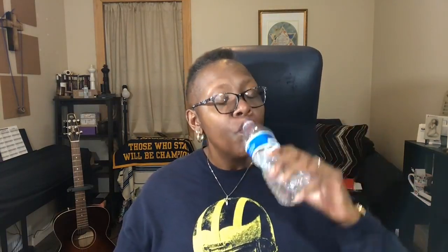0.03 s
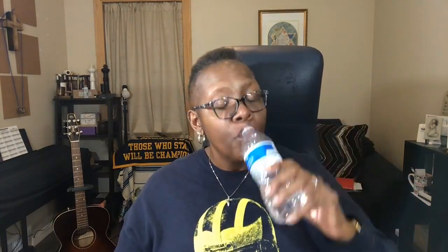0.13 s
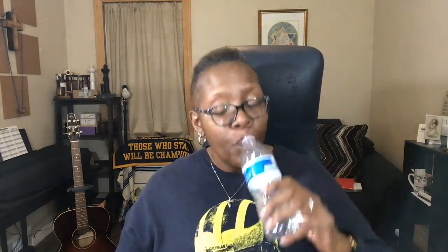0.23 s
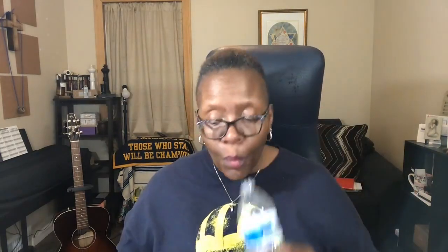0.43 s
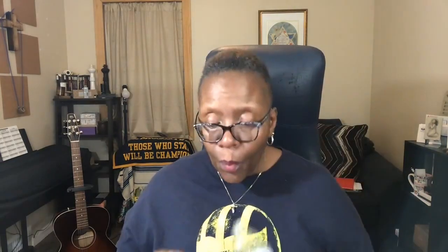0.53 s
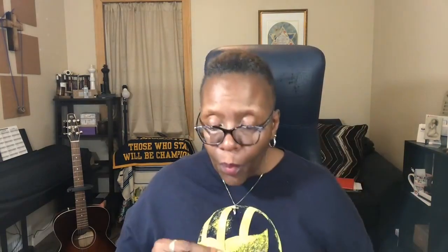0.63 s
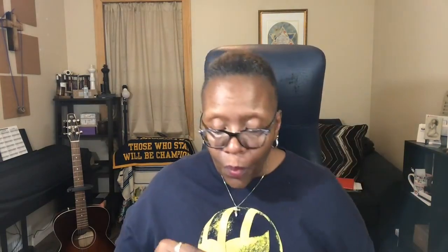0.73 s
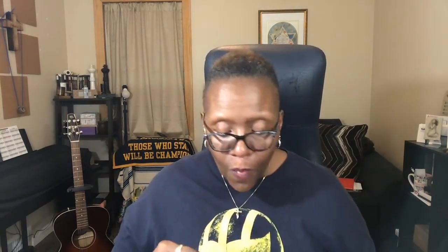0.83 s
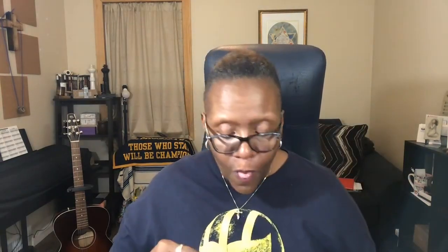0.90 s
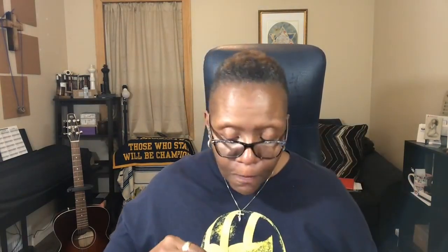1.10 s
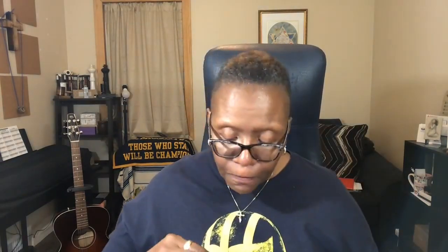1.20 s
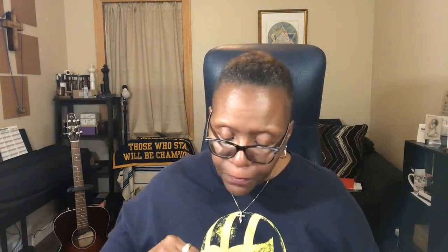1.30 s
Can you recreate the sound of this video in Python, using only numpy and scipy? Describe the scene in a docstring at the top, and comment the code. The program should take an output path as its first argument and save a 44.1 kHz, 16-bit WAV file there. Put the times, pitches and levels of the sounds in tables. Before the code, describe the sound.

Close to a desk microphone in a small room, a flimsy drinking bottle crackles in irregular hard clicks, falls quiet, snaps once more, then is softly rubbed and set down over a faint low rumble.

```python
"""Thin plastic bottle, drunk from and lowered

Over a swaying low rumble and faint hiss (shaped noise), a hand and sleeve rub the plastic (gated noise),
air hisses in at the neck (noise) and water glugs (short sines rising in pitch).
The dented wall pops out in sharp snaps, among handling thuds and set-down knocks: all are
noise bursts through two panel modes, a broad crack and a thump.
A desk and the walls of a small room answer all but the background."""
import sys
import numpy as np
from scipy import signal
from scipy.fft import rfft, irfft, next_fast_len
from scipy.io import wavfile
from scipy.ndimage import uniform_filter1d, map_coordinates

SR = 44100
rng = np.random.default_rng(int(sys.argv[2]) if len(sys.argv) > 2 else 0)


def bounce(signal):
    """Save signal as a 16-bit WAV file at the path given by the first command-line argument."""
    frames = np.transpose(np.atleast_2d(signal))
    limited = np.clip(frames, -1, 1)
    pcm = np.round(limited * 32767).astype(np.int16)
    wavfile.write(sys.argv[1], SR, pcm)


N = 59535  # length [samples]
FFT_SIZE = 4096  # [samples]


def amp(db):
    """Decibels to gain."""
    return 10 ** (np.asarray(db) / 20)


def unit(x):
    """Scale to rms 1."""
    return x / np.sqrt(np.mean(x ** 2) + 1e-20)


def along(points, hz):
    """Read a curve of (frequency, value) points, interpolated on a log frequency axis."""
    f, v = np.transpose(points)
    return np.interp(np.log(hz + 1), np.log(f + 1), v)


def add(track, s, x):
    """Mix x into the track at time s, cut at the track's end."""
    part = track[max(round(s * SR), 0):][:len(x)]
    part += x[:len(part)]


def wobble(rate):
    """A smooth random curve, rate knots a second."""
    knots = rng.standard_normal(int(N * rate / SR) + 4)
    return map_coordinates(knots, [np.arange(N) * rate / SR])


def filtered(x, response):
    """Filter x by a response given as a function of frequency."""
    m = next_fast_len(N + SR // 2)
    hz = np.fft.rfftfreq(m, 1 / SR)
    return irfft(rfft(x, m) * response(hz), m)[:len(x)]


def noise(spectrum):
    """Coloured noise of rms 1."""
    return unit(filtered(rng.standard_normal(N), lambda hz: amp(along(spectrum, hz))))


def causal(gain):
    """The minimum-phase response with this gain, by folding the cepstrum forward."""
    c = irfft(np.log(np.maximum(gain, 1e-6)))
    c[1:len(c) // 2] *= 2
    c[len(c) // 2 + 1:] = 0
    return np.exp(rfft(c))


def evened(burst, size):
    """Spectrum of a short burst, levelled to unit gain over bands of size bins."""
    z = rfft(burst, FFT_SIZE)
    power = np.abs(uniform_filter1d(np.abs(z) ** 2, size))
    return z * causal((power + 1e-20) ** -.5)


def resonance(hz, centre, width):
    """Gain of one resonance, 1 at its centre."""
    return hz * width / np.hypot(centre ** 2 - hz ** 2, hz * width)


def stroke(start, end, fade):
    """A gate with soft edges."""
    t = np.arange(N) / SR
    return np.clip((t - start) / fade + .5, 0, 1) * np.clip((end - t) / fade + .5, 0, 1)


# Spectrum of the low rumble: (frequency [Hz], relative density [dB per Hz])
RUMBLE_SPECTRUM = [(15, -6), (34, 5.5), (48, -9), (65, -22.5), (100, -16), (160, -23), (300, -37),
                   (600, -63)]
# Sway of the rumble: (time [s], level [dB])
RUMBLE_SWAY = [(0, -47.5), (.1, -48), (.19, -52), (.29, -43.5), (.4, -51), (.55, -44), (.66, -55),
               (.76, -52.5), (.86, -44), (.95, -54), (1.03, -43.5), (1.14, -49.5), (1.25, -48.5),
               (1.35, -68)]
# Spectrum of the hiss: (frequency [Hz], relative density [dB per Hz])
HISS_SPECTRUM = [(100, -5), (400, 11), (1000, -4), (3000, -12), (5000, -9), (8000, -18.5), (15000, -22)]
HISS_DB = -77


def background():
    """A low rumble of swaying level and a faint steady hiss, both shaped noise."""
    level_db = np.interp(np.arange(N) / SR, *np.transpose(RUMBLE_SWAY))
    rumble = amp(level_db) * noise(RUMBLE_SPECTRUM)
    hiss = amp(HISS_DB) * noise(HISS_SPECTRUM)
    return rumble + hiss


# Decay of the walls' tail: (frequency [Hz], t60 [s])
WALL_T60 = [(200, 0.37), (530, 0.24), (1400, 0.25), (3700, 0.3), (7000, 0.22), (10000, 0.18), (15000, .16)]
# Colour of the walls' tail: (frequency [Hz], relative level [dB])
WALL_COLOUR = [(150, 3), (260, -5), (330, -6.5), (420, -3.5), (700, -0.5), (1400, 1.5), (2400, -2),
               (4300, -4), (7000, -3.5), (9000, 3), (14000, -2)]
# Low resonances of the room: (frequency [Hz], level at the start [dB], t60 [s])
LOW_MODES = [(264, -56, .36), (404, -64, .31), (584, -68, .24)]
DESK_DELAY_S, DESK_SPREAD_S, DESK_DB = 0.0062, 0.005, -9.5  # first reflections
WALL_DELAY_S, WALL_BUILD_S, WALL_DB = 0.0045, 0.024, -12  # the diffuse tail
# Phase wander from close neighbouring modes [radians], [knots per s]
MODE_BLUR, MODE_BLUR_RATE = .3, 35


def room(x):
    """The direct sound, a cluster of desk reflections, the walls' tail and the low room resonances."""
    t = np.arange(SR // 2) / SR
    desk = rng.standard_normal(len(t)) * (t < DESK_SPREAD_S)
    # The tail is noise that dies at its own rate in each band
    hz, frames, z = signal.stft(rng.standard_normal(len(t)), SR, nperseg=256)
    decay_db = -60 * frames / along(WALL_T60, hz)[:, None]
    z = z * amp(along(WALL_COLOUR, hz)[:, None] + decay_db)
    build = np.clip((t - WALL_DELAY_S) / WALL_BUILD_S, 0, 1)
    tail = signal.istft(z, SR, nperseg=256)[1][:len(t)] * build
    answer = amp(WALL_DB) * tail / np.linalg.norm(tail)
    add(answer, DESK_DELAY_S, amp(DESK_DB) * irfft(evened(desk, size=120)))
    for f, db, t60 in LOW_MODES:
        wander = MODE_BLUR * wobble(MODE_BLUR_RATE)[:len(t)]
        answer += amp(db - 60 * t / t60) * np.sin(2 * np.pi * f * t + wander)
    return x + signal.fftconvolve(x, answer)[:N]


# Strokes of hand and sleeve on the bottle: (start [s], end [s], level [dB])
RUB_STROKES = [(0.129, 0.171, -58), (0.835, 0.926, -61), (0.999, 1.11, -58.5), (1.11, 1.189, -59),
               (1.193, 1.265, -49)]
# Spectrum of the rubbing: (frequency [Hz], relative density [dB per Hz])
RUB_SPECTRUM = [(100, 4), (250, 10), (420, 6.5), (800, -3.5), (1400, -10.5), (2400, -9.5), (3900, -3),
                (6000, -10), (9000, -34.5), (15000, -41.5)]
EDGE_FADE_S = 0.0047  # soft edge of a stroke, also used by the inrush
RUB_ROUGH_DB = 7.5  # depth of the stick and slip, up and down


def rubbing():
    """Uneven friction of hand and sleeve: noise whose level wanders with stick and slip."""
    level = sum(amp(db) * stroke(start, end, EDGE_FADE_S) for start, end, db in RUB_STROKES)
    stick_slip = amp(RUB_ROUGH_DB * np.tanh(wobble(150)))
    return level * unit(noise(RUB_SPECTRUM) * stick_slip)


# Spectrum of the air entering the neck: (frequency [Hz], relative density [dB per Hz])
AIR_SPECTRUM = [(150, -13), (420, -8.5), (900, -13), (2200, -8.5), (3400, -13), (5000, -9), (8000, -20),
                (15000, -25)]
INRUSH_START_S, INRUSH_END_S, INRUSH_DB = .189, .245, -52.5


def inrush():
    """Air hisses into the dented bottle once its neck is free: one gated stretch of noise."""
    gate = stroke(INRUSH_START_S, INRUSH_END_S, EDGE_FADE_S)
    return amp(INRUSH_DB) * gate * noise(AIR_SPECTRUM)


# Glugs of the water: (time [s], level before the soft onset [dB], starting pitch [Hz])
WATER_GLUGS = [(0.063, -37, 442), (0.104, -38.5, 431.3)]
GLUG_RISE_S, GLUG_T60_S = 0.00067, 0.017
GLUG_GLIDE_PER_S = 1.7  # pitch rise as a fraction of the starting pitch


def water():
    """Large bubbles ring as decaying sines, each rising in pitch as it dies."""
    out, t = np.zeros(N), np.arange(SR // 10) / SR
    for s, db, hz in WATER_GLUGS:
        ring = np.sin(2 * np.pi * hz * t * (1 + GLUG_GLIDE_PER_S * t / 2))
        onset = 1 - np.exp(-t / GLUG_RISE_S)
        add(out, s, amp(db - 60 * t / GLUG_T60_S) * onset * ring)
    return out


LEAD_S, LEAD_DB = .0018, -16  # faint creak just before the hit
BURST_S = 0.00045  # half length of the main burst
CHATTER_T60_S, CHATTER_DB = .011, -4.5  # spiky tail after the burst


def hit_force():
    """A faint creak, a main burst and a dying chatter (in a snap: strain, buckle, settling creases)."""
    t = np.arange(FFT_SIZE) / SR - LEAD_S  # the burst peaks at 0
    lead, burst, chatter = rng.standard_normal((3, FFT_SIZE))
    lead = unit(lead * (t < 0))
    burst = unit(burst * np.exp(-(t / BURST_S) ** 2))
    settling = (t > 0) * amp(-60 * np.abs(t) / CHATTER_T60_S)
    chatter = unit(chatter * np.abs(chatter) * settling)  # squaring makes it spikier
    force = amp(LEAD_DB) * lead + burst + amp(CHATTER_DB) * chatter
    return evened(force, size=50)


# Colour of the plastic, common to all hits: (frequency [Hz], gain [dB])
PLASTIC_COLOUR = [(150, -0.5), (205, -12.5), (265, 6.5), (330, -5), (405, 7.5), (490, -4.5), (590, -2),
                  (680, 2), (780, -2), (1050, 0.5), (1350, -2.5), (1900, 4), (2550, 3), (3200, 1),
                  (3750, -0.5), (4700, 0.5), (7300, -1), (8700, -2), (9700, -6), (12500, -2), (16000, -6.5)]
PANEL_SKIRT = 1.418  # steepness of a panel's resonance
PANEL_TOP = 2.38  # a panel radiates little above this multiple of its higher mode
SECOND_Q = 8.3  # sharpness of the second mode
CRACK_LOW_HZ, CRACK_SLOPE = 696, 21  # lower edge of the crack; steepness above its upper edge
SIZZLE_DB = -19.5  # the crack's weaker octave above that edge
THUMP_Q, THUMP_SKIRT = 1.54, 1.546  # the whole bottle flexing


def hit(panel_hz, width_hz, second_hz, second_db, crack_db, edge_hz, thump_hz, thump_db):
    """The force excites two panel modes, a broad crack and a thump of the whole bottle."""
    hz = np.fft.rfftfreq(FFT_SIZE, 1 / SR)
    panel = resonance(hz, panel_hz, width_hz) ** PANEL_SKIRT
    second = amp(second_db) * resonance(hz, second_hz, second_hz / SECOND_Q) ** PANEL_SKIRT
    panel_top_hz = PANEL_TOP * max(panel_hz, second_hz)
    modes = np.hypot(panel, second) / np.hypot(1, (hz / panel_top_hz) ** 4)

    body = 1 / np.hypot(1, (hz / edge_hz) ** CRACK_SLOPE)
    sizzle = amp(SIZZLE_DB) / np.hypot(1, (hz / (2 * edge_hz)) ** CRACK_SLOPE)
    crack = amp(crack_db) * (body + sizzle) * hz / np.hypot(hz, CRACK_LOW_HZ)

    thump = amp(thump_db) * resonance(hz, thump_hz, thump_hz / THUMP_Q) ** THUMP_SKIRT
    thump = thump / np.hypot(1, (hz / edge_hz) ** 2)

    colour = np.sqrt(modes ** 2 + crack ** 2 + thump ** 2) * amp(along(PLASTIC_COLOUR, hz))
    return irfft(hit_force() * causal(colour))


# Snaps, handling thuds and set-down knocks of the bottle: (time of the main burst [s],
# level before the plastic's colour [dB], panel pitch [Hz], panel width [Hz], second mode [Hz],
# second mode level [dB], crack level [dB], crack upper edge [Hz], thump pitch [Hz], thump level [dB]);
# the last three levels are relative to the panel
BOTTLE_HITS = [ (0.0402, -22, 3600, 1150, 2880, -12, -8, 3300, 960, 3),
               (0.1385, -35.5, 4440, 1500, 2780, -21, -23, 6000, 450, -3),
               (0.158, -23, 3140, 1600, 5200, -4.5, -10, 5700, 450, -23),
               (0.174, -29.5, 3170, 1210, 2270, 6, -2, 6200, 450, -22),
               (0.1890, -18.5, 5200, 1179, 2220, -3, -5, 11000, 447, 6.5),
               (0.2401, 16.5, 2300, 750, 4680, -10, -18, 5510, 492, -8),
               (0.2533, 17.5, 4790, 900, 3320, -6.5, -15, 6600, 453, -2.5),
               (0.3174, 10, 2367, 330, 1280, 2, -15, 3500, 454, 4.5),
               (0.4163, 16.5, 4160, 1500, 2623, 0.5, -12, 7000, 488.5, 4),
               (0.4240, 1.5, 2800, 1727, 4900, -14.5, -4.5, 6500, 275, 14),
               (0.4758, 16, 3902, 1083, 2568, -5.5, -12.5, 5740, 540.4, -9.5),
               (0.485, 5.5, 3660, 1200, 2580, 3.5, -16, 5670, 500, -26),
               (0.8200, -35, 3880, 900, 1100, 2.5, -13.5, 5000, 330, 19),
               (0.8450, -28.5, 3900, 500, 2580, -12.5, -17, 5500, 268, 10),
               (0.8650, -35.5, 4000, 700, 2595, -9.5, -12.5, 5460, 350, 18),
               (0.8796, 14.5, 6710, 2602, 4410, -0.5, -13, 9500, 814, -9.5),
               (1.0953, -13, 3800, 600, 1800, -31, -26.5, 5800, 372, 3.5),
               (1.199, -34, 3990, 2480, 1800, 1, 8.5, 5670, 377.4, 21.5),
               (1.2087, -6.5, 3400, 900, 4730, -14, -8.5, 5200, 430, 5),
               (1.2413, -15, 3780, 1500, 1850, 2.5, -9.5, 6700, 400, 16),
               (1.2460, -7.5, 3990, 1200, 980, 10.5, -13.5, 5500, 470, 10), ]


def bottle():
    """Each snap, thud or knock gets a freshly drawn room answer."""
    out = np.zeros(N)
    for s, db, *panel in BOTTLE_HITS:
        one = np.zeros(N)
        add(one, s - LEAD_S, amp(db) * hit(*panel))
        out += room(one)
    return out


def scene():
    """The background plus the bottle's sounds with the room's answer."""
    soft_sounds = room(water() + inrush() + rubbing())
    return (background() + soft_sounds + bottle())[None]


TOP_HZ = 16200


def record(dry):
    """Nothing is kept above the recorder's band limit."""
    return filtered(dry[0], lambda hz: hz < TOP_HZ)[None]


dry = scene()
out = record(dry)
bounce(out)
```